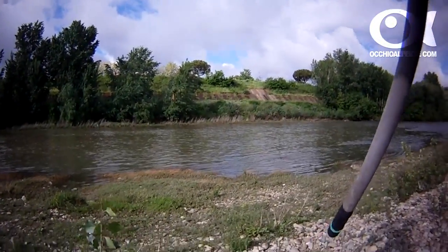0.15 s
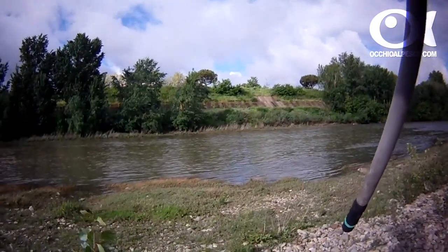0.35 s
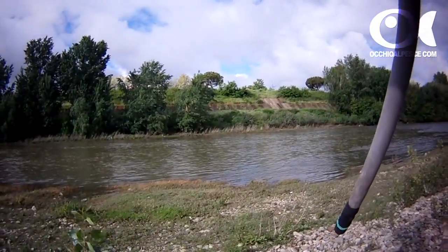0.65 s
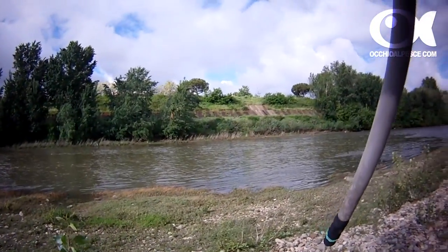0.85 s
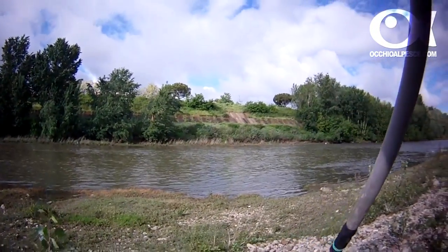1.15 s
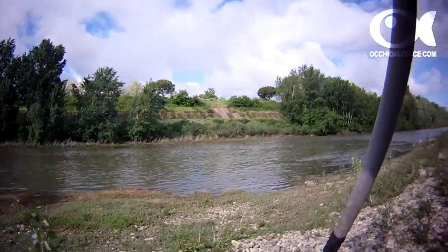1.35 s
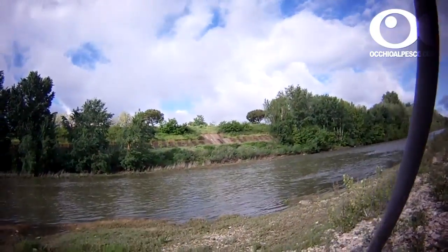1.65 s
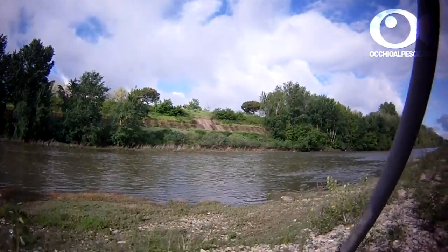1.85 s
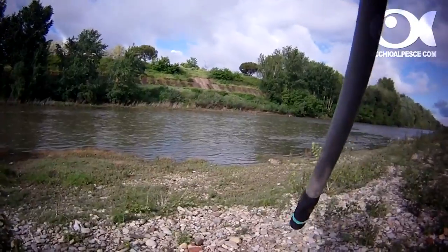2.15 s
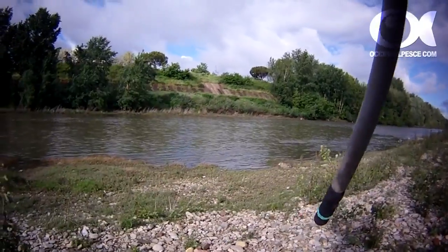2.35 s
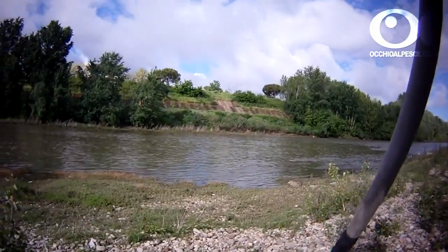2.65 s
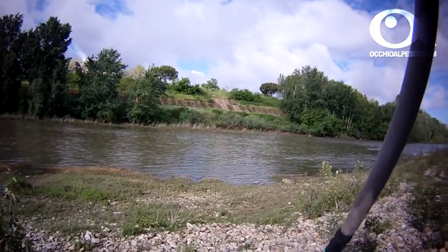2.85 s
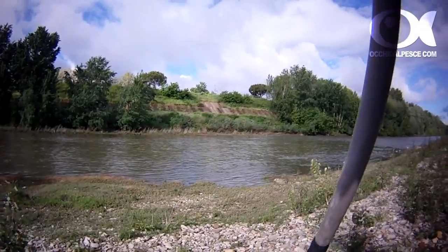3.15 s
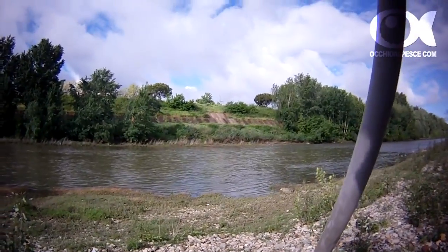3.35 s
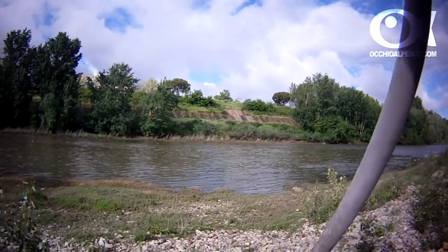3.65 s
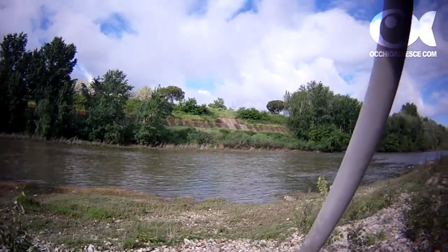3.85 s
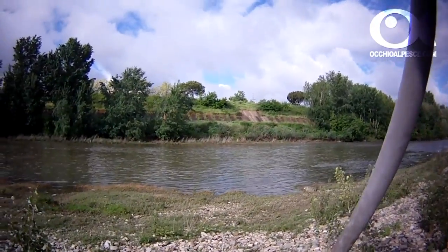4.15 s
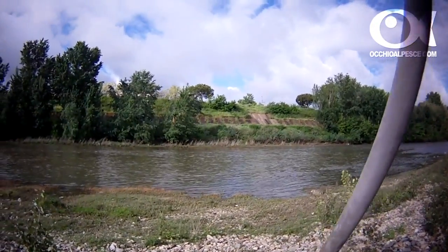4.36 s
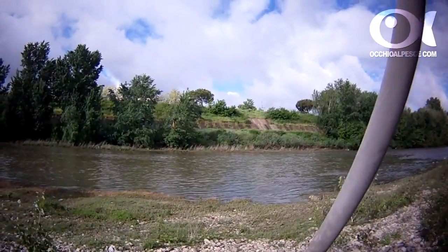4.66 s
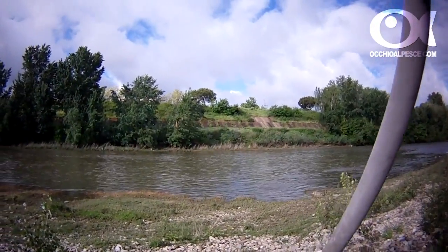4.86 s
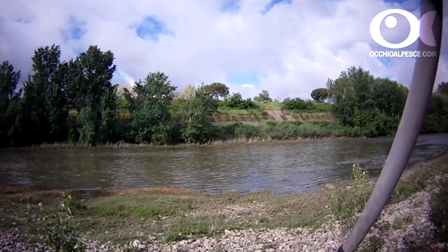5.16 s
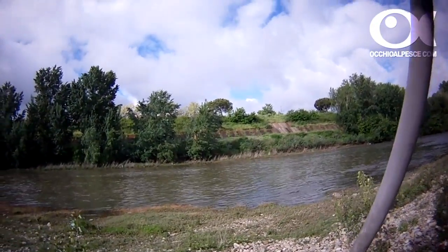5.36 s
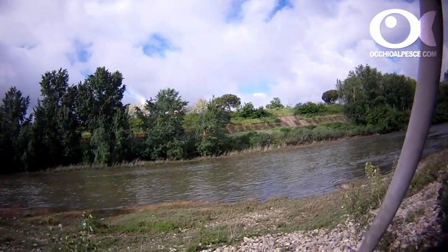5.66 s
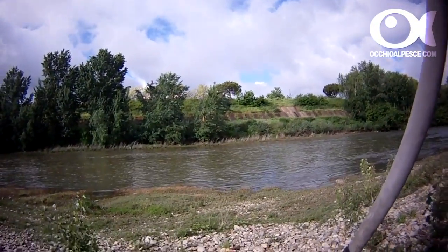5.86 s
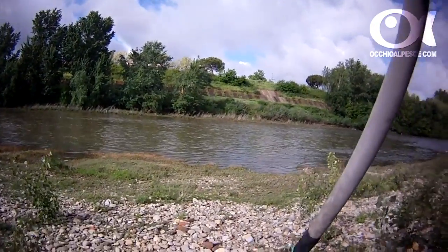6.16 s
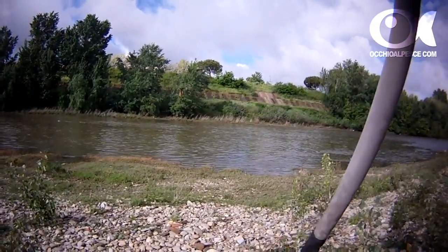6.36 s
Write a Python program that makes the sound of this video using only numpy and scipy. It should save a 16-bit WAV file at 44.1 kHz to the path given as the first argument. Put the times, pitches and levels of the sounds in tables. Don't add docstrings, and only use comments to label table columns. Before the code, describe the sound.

Shoes grind loose gravel in irregular bunches with hard stone knocks and hollow handling bumps; brief bright birdsong comes midway over soft river hiss.

```python
import sys
import numpy as np
from scipy import signal
from scipy.fft import rfft, irfft, next_fast_len
from scipy.io import wavfile
from scipy.ndimage import map_coordinates

SR = 44100
rng = np.random.default_rng(int(sys.argv[2]) if len(sys.argv) > 2 else 0)


def rack_gain(trim_db):
    fader = np.asarray(trim_db, float)
    return 10 ** (fader / 20)


def pcm_store(signal):
    levels = np.round(np.clip(np.atleast_2d(signal), -1, 1) * 32767)
    wavfile.write(sys.argv[1], SR, levels.astype(np.int16).T)


N = 287091

# t/s, level/dB
WIND = [(0.0, -94), (0.09, -67), (0.4, -78), (0.63, -76), (1.18, -94), (1.32, -61), (1.56, -83.5),
        (2.25, -67.5), (2.36, -80.5), (5.44, -78), (5.86, -92), (5.93, -67.5), (6.46, -76), (6.51, -100)]
# f/Hz, density/dB
HUSH = [(26, -34), (45, -11.5), (81, -11), (367, -7), (744, -8), (1240, 0), (2020, -7.5), (2640, -3),
        (2990, -5), (4860, -2), (6680, -10.5), (7920, -8), (8730, -15), (15300, -17.5)]
# f/Hz, level/dB
WHINE = [(7777, -83), (7837, -74.5), (7867, -84), (7897, -75.5), (7957, -85), (11090, -82.5)]
# f/Hz, density/dB
HISS = [(300, -19.5), (766, -13.5), (1100, -20), (3500, -20), (4940, -18.5), (6500, -27), (8600, -8),
        (15500, -5)]
# f/Hz, t60/s
BANK_DECAY = [(200, 0.074), (2000, 0.024), (10000, 0.15)]
# start/s, length/s, from/Hz, to/Hz, level/dB
SLIDES = [(.47, .16, 2870, 2810, -74), (2.01, 0.031, 2870, 2920, -62), (3.315, 0.044, 3960, 3900, -68.5),
          (3.834, 0.027, 4010, 3720, -64), (3.872, 0.052, 2940, 2620, -65),
          (4.01, 0.063, 3330, 3090, -58.5), (4.28, 0.027, 4020, 3680, -63), (4.303, .026, 3600, 4100, -62),
          (4.32, .02, 2900, 3000, -67), (4.49, 0.23, 2560, 2590, -76.5), (4.945, 0.048, 4180, 3080, -62.5),
          (5.455, .04, 3850, 3130, -59)]
# start/s, length/s, from/Hz, to/Hz, level/dB
HOOKS = [
    (3.74, 0.061, 3100, 3280, -64.5),
    (4.33, 0.039, 4270, 4410, -68),
    (4.405, 0.066, 3600, 3180, -60),
    (4.525, 0.083, 4050, 3355, -59),
    (4.815, 0.032, 2710, 2620, -66.5),
    (5.015, .08, 2600, 2900, -57),
    (5.515, 0.067, 2600, 2860, -60.5),
]
# start/s, length/s, from/Hz, to/Hz, level/dB
FAR_CALLS = [
    (.94, .09, 1550, 1930, -75),
    (1.03, .095, 1990, 1700, -75),
]
# f/Hz, width/Hz, level/dB
BOOM = [(170, 150, -10.5), (473, 60.4, 7), (673, 80, -4)]
# f/Hz, width/Hz, level/dB
LOW = [(916, 133, -2), (1202, 197, -1.5), (1618, 209, 1.5)]
# f/Hz, width/Hz, level/dB
MIDDLE = [(2540, 530, 0.5), (3280, 120, 8.5), (3600, 473, 3)]
# f/Hz, width/Hz, level/dB
HIGH = [(4800, 423, 2.5), (5700, 1290, -3.5), (6770, 1210, -7.5), (8000, 670, -13.5), (9570, 1100, -23.5)]
# f/Hz, width/Hz, level/dB
STONE_LOW = [(945, 166, -5), (1250, 160, -0.5), (1588, 162, 4)]
# f/Hz, width/Hz, level/dB
STONE_MIDDLE = [(2620, 320, 0), (3370, 350, 3.5), (4050, 750, -4.5)]
# f/Hz, width/Hz, level/dB
SPIT_RING = [(5000, 900, 1), (6700, 1900, 0), (8650, 1800, -5), (11000, 2200, -14)]
# t/s, peak/dB, pitch/Hz, boom ring/dB
JOLTS = [(0.949, -60.5, 300, 0), (1.074, -65, 80, -22), (1.11, -56, 170, 7), (1.231, -49, 190, -20),
         (1.755, -65, 70, -20), (2.051, -57.5, 120, 6), (2.195, -52, 170, -6.5), (2.385, -72, 70, -4),
         (2.569, -58.5, 130, -1), (2.71, -62, 120, 4), (2.823, -58.5, 154, -7), (3.038, -60, 120, 8.5),
         (3.965, -64, 90, -27), (4.189, -50, 202, -3), (5.308, -48.5, 203, -11), (5.437, -58, 150, -6),
         (5.843, -65, 200, -15), (5.945, -60, 60, -21), (6.094, -55.5, 123, 5), (6.329, -69, 60, -6)]
# t/s, peak/dB, brightness/dB
CLACKS = [(0.008, -30, 4), (0.077, -40, 5), (0.087, -32.5, 15), (0.12, -34, 13.5), (0.322, -29, -9.5),
          (1.333, -28, -9), (1.467, -30, -10), (1.473, -30, -16), (1.547, -15, -14.5), (1.919, -27, 22.5),
          (1.933, -34, 9), (4.092, -45, -17.5), (4.236, -38, -10), (4.761, -41.5, -19.5), (5.054, -23, 2),
          (5.13, -30.5, -3), (5.247, -40, -13), (5.344, -40, -14)]
# t/s, peak/dB, brightness/dB
KNOCKS = [(0.056, -44, 3), (0.106, -51, -7), (0.369, -46, -11.5), (0.693, -59, -12.5), (1.268, -44.5, 0.5),
          (1.515, -42.5, -7), (2.219, -47.5, -12.5), (2.819, -46.5, -7), (3.036, -43.5, 0), (3.544, -41, 3),
          (3.97, -40, -1), (4.133, -47, -2.5), (4.187, -42.5, -12.5), (4.202, -54, 9.5), (4.27, -49.5, -2),
          (4.688, -52.5, -6.5), (5.027, -47, -6), (5.035, -43, -9.5), (5.064, -44.5, -8), (5.139, -50, 1.5),
          (5.238, -48.5, -9.5), (5.252, -45, -6.5), (5.296, -44, -10.5), (5.312, -42, -5),
          (5.383, -41.5, -8), (5.432, -40, -7.5), (5.839, -41.5, -11.5), (6.003, -39, 11),
          (6.044, -46, -16.5), (6.094, -41.5, 1.5)]
# t/s, level/dB, t60/s
SPITS = [
    (1.268, -56, .012),
    (3.544, -48, .012),
    (4.199, -44.5, 0.011),
    (5.077, -42.5, 0.024),
    (6.004, -39.5, 0.017),
]
# start/s, hold/s, level/dB, coarseness/dB
CRUNCHES = [(0.076, 0.012, -52, 2.5), (0.197, 0.027, -49.5, -1), (0.285, 0.024, -57, -2.5),
            (0.36, 0.027, -56, 2.5), (1.335, 0.032, -56.5, 2), (1.392, 0.021, -48.5, 1),
            (1.469, 0.056, -47.5, 0), (1.535, 0.044, -54.5, 2.5), (1.741, 0.0083, -46.5, -2),
            (1.784, .09, -45.5, 0), (1.913, 0.037, -50.5, 3), (2.055, 0.027, -52.5, 3.5),
            (2.826, 0.023, -56, 2), (3.559, 0.058, -54, -1), (3.651, 0.073, -50.5, 0),
            (3.852, 0.021, -56, 1.5), (3.983, 0.02, -45.5, -2), (4.179, 0.031, -54, 3.5),
            (5.036, 0.049, -58, 2.5), (5.239, .025, -57, 3), (5.308, 0.041, -47.5, 3.5),
            (5.353, 0.042, -54.5, 5.5), (5.423, 0.04, -49.5, 2.5), (5.659, .05, -54.5, 1),
            (5.73, 0.072, -55, 1.5), (5.811, 0.052, -50.5, 3.5), (5.91, 0.1, -47, 1.5),
            (6.1, 0.019, -54.5, 1),
            (0.0, 0.011, -54.5, 1.5), (0.124, 0.026, -56.5, 0.5), (0.614, 0.07, -69, 2),
          (0.77, 0.041, -74, -19), (1.093, 0.071, -59.5, 3), (1.216, 0.084, -59.5, 0),
          (1.687, 0.034, -62, 5), (2.0, 0.019, -58.5, -1.5), (2.134, 0.089, -65.5, -2),
          (2.387, 0.03, -63, 2), (2.452, 0.027, -64, 3), (2.61, 0.014, -60, 4), (2.712, 0.018, -72, 7),
          (2.776, 0.045, -62, 0.5), (3.047, 0.033, -60.5, 2.5), (3.243, 0.09, -62.5, 6),
          (3.478, 0.028, -70, 6), (4.116, 0.016, -63, -1.5), (4.69, 0.021, -69, 4),
          (4.746, 0.017, -66.5, 6.5), (4.927, 0.066, -69, 7), (5.15, 0.048, -61.5, 3.5),
          (5.483, 0.025, -59, 5), (5.607, 0.033, -60, 4.5), (6.302, 0.057, -60.5, 3.5)]
# offset from row level/dB, slope per dB of coarseness/dB, restless gravel between steps/dB
STONE_SIZES = [
    (-13.5, 2.02, -88),
    (-2.5, 0.75, -71.5),
    (-0.06, -0.37, -67.5),
    (-2.5, -0.38, -70.5),
]


def unit(x):
    return x / np.sqrt(np.mean(x ** 2) + 1e-20)


def along(points, hz):
    f, v = np.transpose(points)
    return np.interp(np.log(hz + 1), np.log(f + 1), v)


def wobble(rate):
    knots = rng.standard_normal(int(N * 400 / SR) + 4)
    return map_coordinates(knots, [np.arange(N) * min(rate, 400) / SR])


def filtered(x, response):
    m = next_fast_len(N + SR // 2)
    return irfft(rfft(x, m) * response(np.fft.rfftfreq(m, 1 / SR)), m)[..., :N]


def rung(x, modes):
    top_hz, foot_hz = 1.63 * modes[-1][0], 0.33 * modes[0][0]

    def response(f):
        lower_edge = (1j * f / (foot_hz + 1j * f)) ** 2
        upper_edge = 1 - (f / top_hz) ** 2 + 1.4j * f / top_hz
        ring = 0
        for k, (center, width, db) in enumerate(modes):
            ring = ring + (-1) ** k * rack_gain(db) * 1j * f * width / (center ** 2 - f ** 2 + 1j * f * width)
        return lower_edge / upper_edge * ring

    return filtered(x, response)


def background():
    hush = unit(filtered(rng.standard_normal(N), lambda hz: rack_gain(along(HUSH, hz))))
    rumble = [(8, -30), (20, 12.5), (45, -10.5), (90, -15.0), (250, -21), (900, -70)]  # f/Hz, density/dB
    buffet = filtered(rng.standard_normal(N), lambda hz: rack_gain(along(rumble, hz)))
    wind_s, wind_db = np.transpose(WIND)
    gusts = rack_gain(np.interp(np.arange(N) / SR, wind_s, wind_db))
    return rack_gain(-61.5 + 0.52 * wobble(3.77)) * hush + gusts * unit(rack_gain(1.3 * wobble(23)) * buffet)


def bank(x):
    hz, t, z = signal.stft(rng.standard_normal(SR // 4), SR, nperseg=256)
    decay = rack_gain(-60 * t / along(BANK_DECAY, hz)[:, None])
    tail = signal.istft(z * decay, SR, nperseg=256)[1]
    delayed = np.pad(x, (120, 0))
    return signal.fftconvolve(delayed, tail / np.linalg.norm(tail))[:N]


def whistles(notes, slows, swell, waver_hz):
    out, waver = np.zeros(N), waver_hz * wobble(120)
    for s, length, from_hz, to_hz, db in notes:
        u, at = np.linspace(0, 1, round(length * SR)), round(s * SR)
        glide = np.expm1(-slows * u) / np.expm1(-slows)
        hz = from_hz + (to_hz - from_hz) * glide + waver[at:at + len(u)]
        envelope = np.abs(np.sin(np.pi * u)) ** swell
        out[at:at + len(u)] += rack_gain(db + 6.0) * envelope * np.sin(2 * np.pi * np.cumsum(hz) / SR)
    return out


def bird():
    hooks = whistles(HOOKS, slows=3.72, swell=0.29, waver_hz=14)
    slides = whistles(SLIDES, slows=0.11, swell=0.36, waver_hz=12)
    far = whistles(FAR_CALLS, slows=1.1, swell=0.4, waver_hz=45) * rack_gain(5 * wobble(60))
    return (hooks + slides + far) * rack_gain(2.6 * wobble(60))


def jolts():
    push, knock, t = np.zeros(N + SR), np.zeros(N), np.arange(SR // 10) / SR
    for s, db, hz, boom_db in JOLTS:
        envelope = np.exp(-1.6 * hz * t) * (1 - np.exp(-t / 0.0014))
        push[round(s * SR):][:len(t)] += rack_gain(db + 5.5) * np.sin(2 * np.pi * hz * t) * envelope
        knock[round(s * SR)] = rack_gain(db + boom_db + 40.5)
    return push[:N] + rung(knock, BOOM[1:])


def spits():
    t = np.arange(N) / SR
    bursts = sum((t > s) * rack_gain(db - 60 * np.abs(t - s) / t60) for s, db, t60 in SPITS)
    return rung(rack_gain(10.5) * bursts * rng.standard_normal(N), SPIT_RING)


def snaps():
    s, db, bright_db = np.transpose(CLACKS + KNOCKS)
    counts = [len(CLACKS), len(KNOCKS)]
    outer_db = db - np.repeat([13, -1.5], counts)
    body_db = db - bright_db - np.repeat([28, 0.1], counts)
    layers = [(STONE_LOW, outer_db - bright_db, 27), (STONE_MIDDLE, db, 23),
              (HIGH[:3], outer_db + bright_db, 23), (BOOM, body_db, 19)]
    out = np.zeros(N)
    for modes, ring_db, drive_db in layers:
        late_s = rng.random((len(s), 3)) * [0.0003, 0.0015, 0.002] + [0.0007, 0.0019, 0.0037]
        blows = rack_gain(ring_db + drive_db)[:, None] * [1, 0.4, 0.15]
        where = np.round((s[:, None] + late_s) * SR).astype(int)
        out += rung(np.bincount(where.ravel(), blows.ravel(), N)[:N], modes)
    return out


def pressure(size):
    over_db, per_coarse, rest_db = size
    t = np.arange(0, N + 32, 32) / SR
    s, hold, db, coarse = np.transpose(CRUNCHES)[:, :, None]
    rise_db, fall_db = 436 * (t - s), 397 * (s + hold - t)
    shape_db = np.minimum(0, np.minimum(rise_db, fall_db))
    presses = rack_gain(db + over_db + per_coarse * coarse + shape_db)
    level = np.sqrt(np.sum(presses ** 2, axis=0) + rack_gain(rest_db) ** 2)
    return np.interp(np.arange(N) / SR, t, level)


def grinding(modes, slips, per_s, scatter_db, clump_db, smooth):
    chance, size, sign = rng.random(N), rng.exponential(size=N), np.sign(rng.standard_normal(N))
    contacts = (chance < per_s / SR) * sign * rack_gain(scatter_db * np.minimum(size, 3.5))
    clumps = rack_gain(clump_db * wobble(45) + slips)
    scrape = smooth * rng.standard_normal(N)
    return unit(rung(clumps * (unit(contacts) + scrape), modes))


def gravel():
    thud, large, medium, grit = map(pressure, STONE_SIZES)
    slips = 1.08 * wobble(150) + 1.93 * wobble(35)
    return (thud * grinding(BOOM, slips, per_s=250, scatter_db=2.5, clump_db=1.0, smooth=0.7)
            + large * grinding(LOW, slips, per_s=500, scatter_db=4.0, clump_db=2.0, smooth=0.8)
            + medium * grinding(MIDDLE, slips, per_s=1000, scatter_db=4.0, clump_db=1.5, smooth=0.9)
            + grit * grinding(HIGH, slips, per_s=1500, scatter_db=4.0, clump_db=2.0, smooth=1.0))


def scene():
    stones, song = snaps(), bird()
    scatter = rack_gain(-13.5) * bank(stones) + rack_gain(-11) * bank(song)
    steps = gravel() + stones + jolts() + spits()
    return np.tile(background() + song + scatter + steps, (2, 1))


def top_cut(x):
    return signal.sosfilt(signal.butter(12, 15620, fs=SR, output="sos"), x)


def record(dry):
    t = np.arange(N) / SR
    whine = sum(rack_gain(db - 0.5 + 1.0 * wobble(3.8)) * np.sin(2 * np.pi * hz * t) for hz, db in WHINE)
    hiss = rack_gain(-78.5) * unit(filtered(rng.standard_normal(N), lambda hz: rack_gain(along(HISS, hz))))
    mix = filtered(dry + whine + hiss * [[1], [-1]], lambda hz: hz < 15320)
    return top_cut(mix)


dry = scene()
out = record(dry)
pcm_store(out)
```